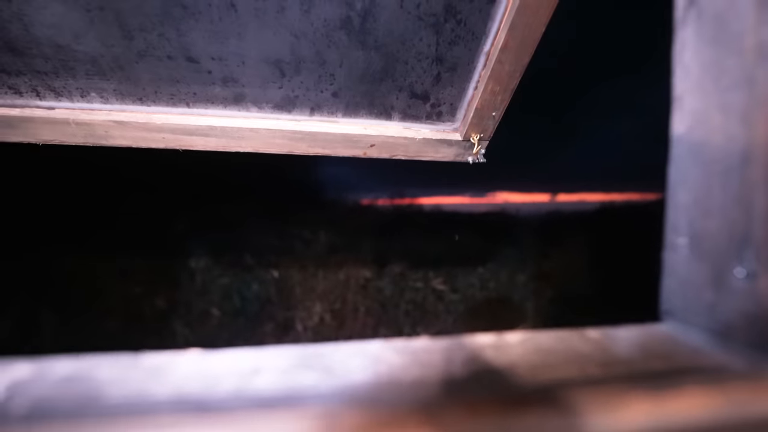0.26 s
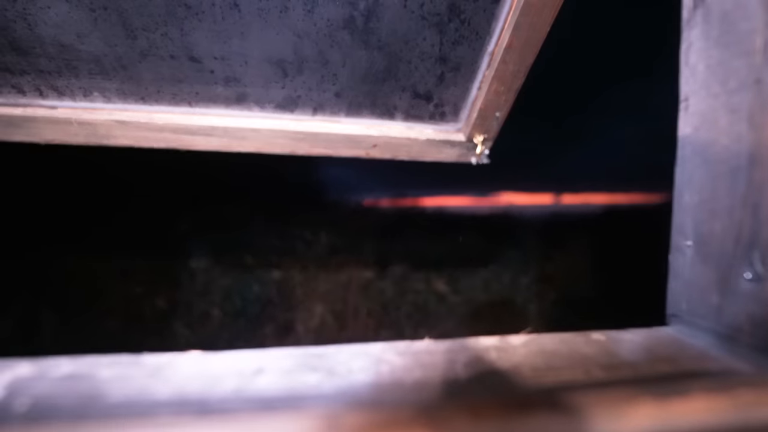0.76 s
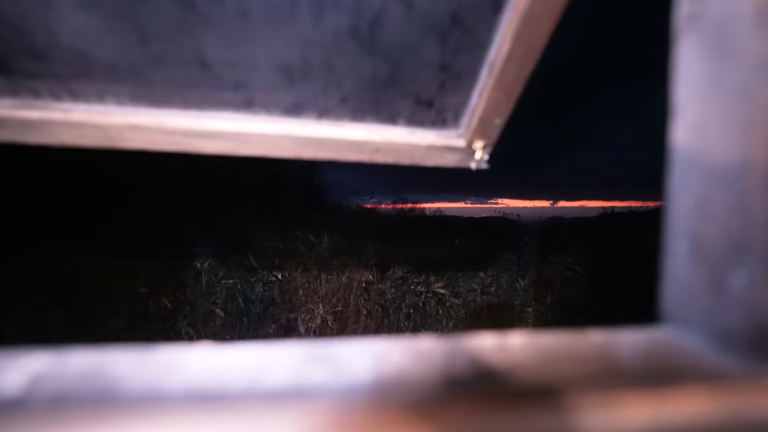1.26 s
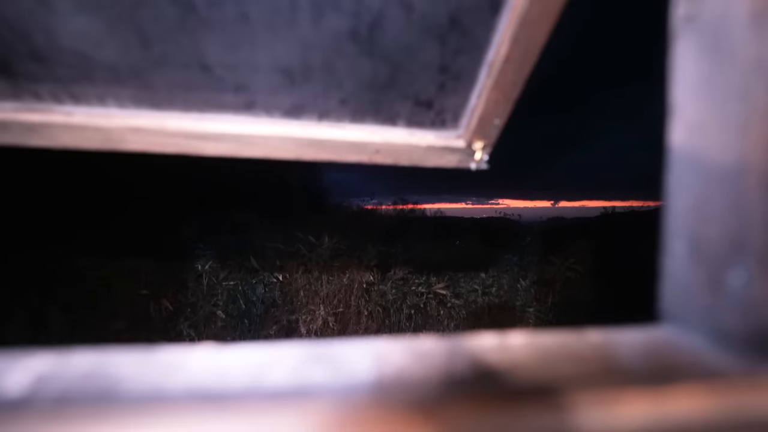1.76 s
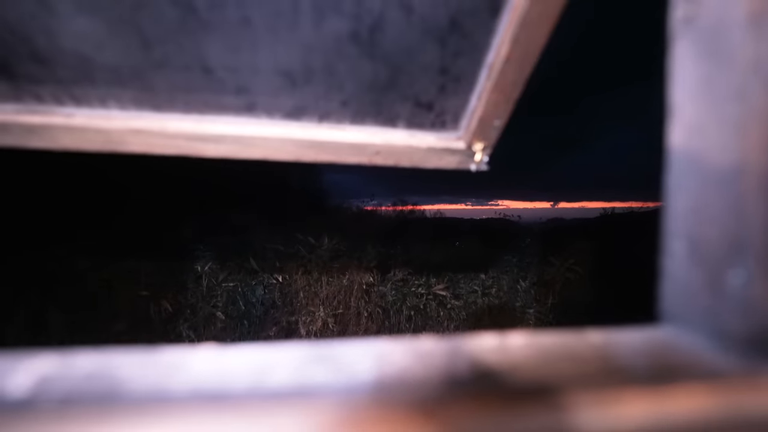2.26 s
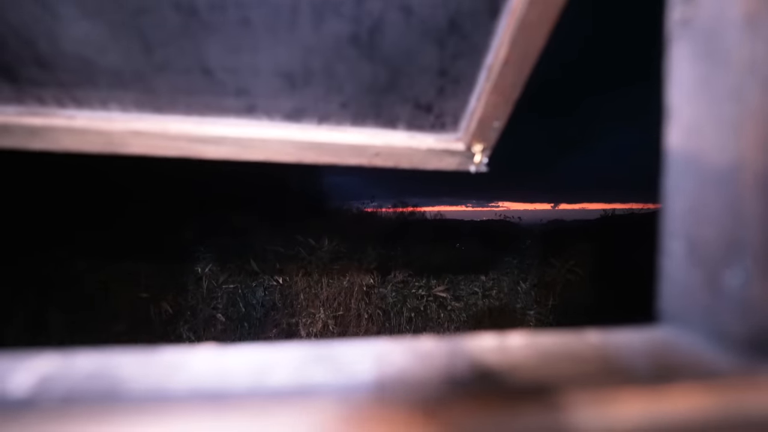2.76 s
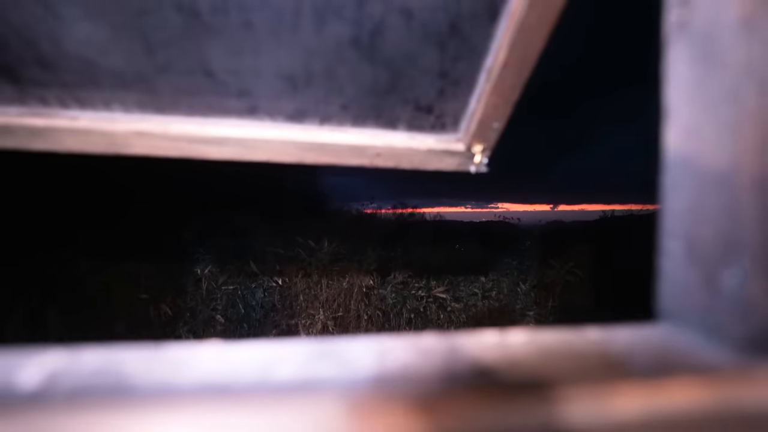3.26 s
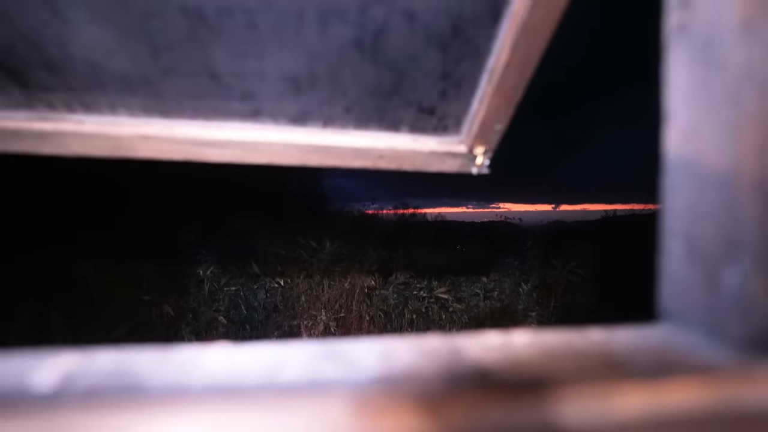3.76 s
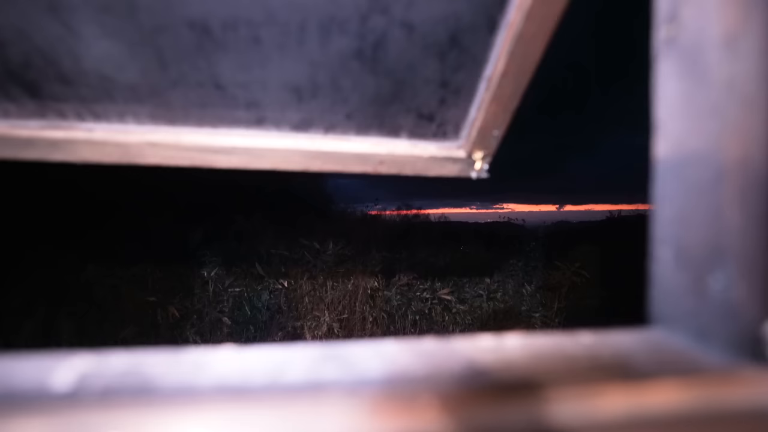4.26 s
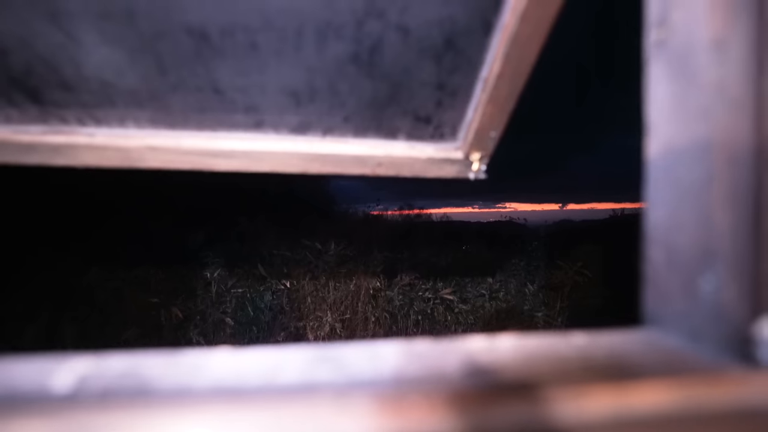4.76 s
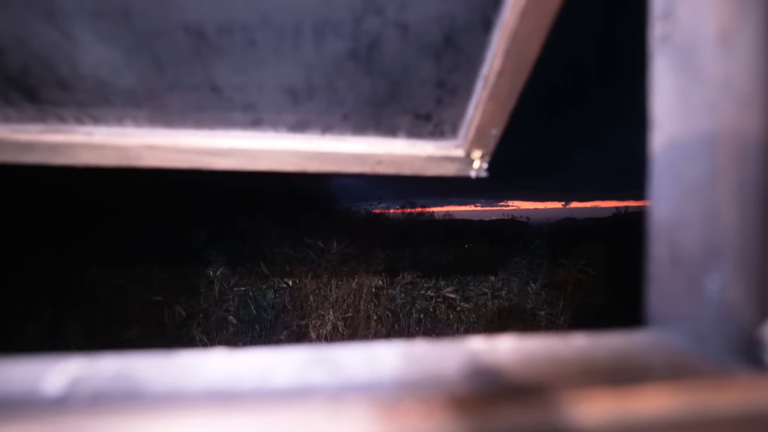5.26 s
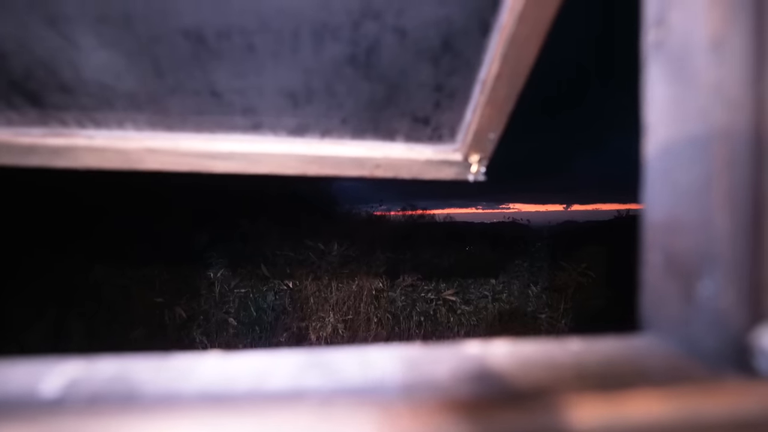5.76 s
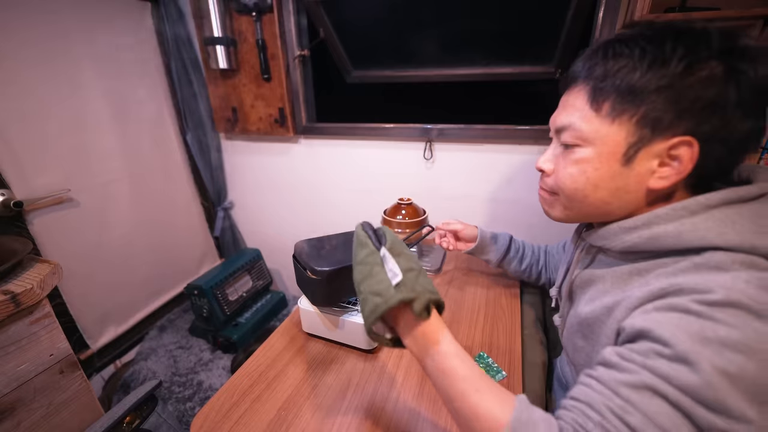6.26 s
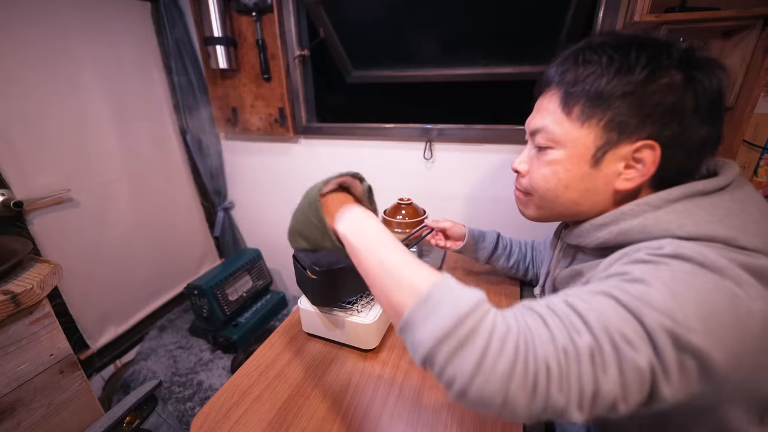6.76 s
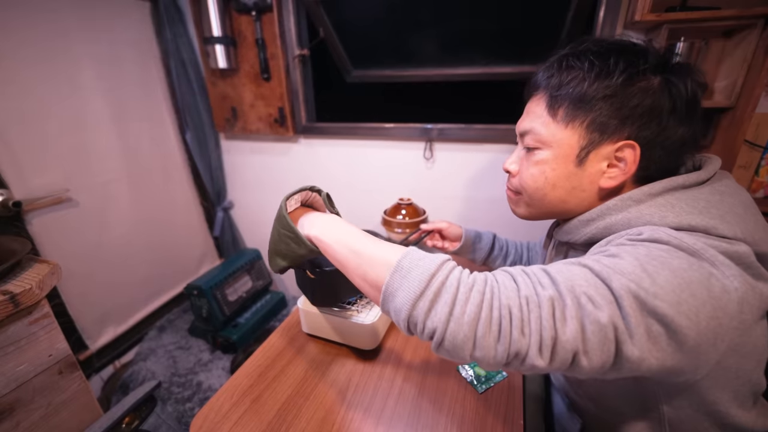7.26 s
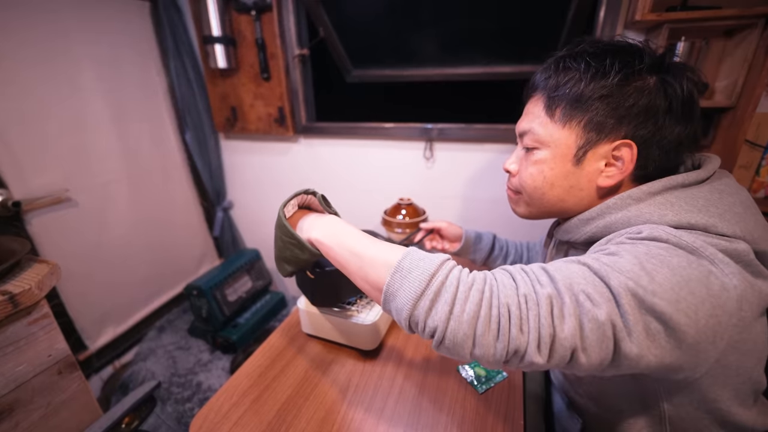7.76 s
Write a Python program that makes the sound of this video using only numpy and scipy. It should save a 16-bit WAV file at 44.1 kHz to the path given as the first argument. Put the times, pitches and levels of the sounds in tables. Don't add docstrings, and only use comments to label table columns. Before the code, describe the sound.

In a small wooden cabin, food simmers under a lid, round bubbles popping irregularly over a faint gas hiss and a steady thin electrical buzz. Wind makes panels hum low and the floor thuds dully, heaviest as a double knock. After about six seconds the microphone is suddenly close: the boil sounds open, with thick low plops and brighter burner hiss, and a metal lid ticks three times on the rim.

```python
import sys
import numpy as np
from scipy import signal
from scipy.fft import rfft, irfft, next_fast_len
from scipy.io import wavfile
from scipy.ndimage import uniform_filter1d

SR = 44100
rng = np.random.default_rng(int(sys.argv[2]) if len(sys.argv) > 2 else 0)


def bounce(signal):
    frames = np.transpose(np.atleast_2d(signal))
    limited = np.clip(frames, -1, 1)
    pcm = np.round(limited * 32767).astype(np.int16)
    wavfile.write(sys.argv[1], SR, pcm)


def volts(x):
    e = np.asarray(x, float) / 20
    return 10 ** e


N = 353682
MOVE_START_S, MOVE_END_S = 6.21, 6.27
SIMMER_DB = -49.5

# freq_hz, density_db
SHUT = [(120, -26), (200, 1), (323, 3), (420, -1.5), (567, 3.5), (832, -15), (915, -13.5), (1040, -10),
        (1160, 0), (1430, -13), (1590, -6), (2090, -16.5), (2270, -13), (2820, -24), (3500, -23),
        (4550, -54), (7700, -120)]
# freq_hz, width_hz, level_db
PAN_SHUT = [(321, 60, 0), (581, 146, -1.5), (924, 59, -4), (1184, 75, 0.5), (1380, 87, -7.5),
            (1620, 90, -7.5), (2225, 92, -18.5)]


def simmer_shut():
    boil = seethe(SHUT, -1.1, low_db=1.7, high_db=1.58)
    return volts(SIMMER_DB) * (boil + froth(PAN_SHUT, 0, 6.3, -4.5, 4.7, decay_s=0.0029, count=1500))


# freq_hz, density_db
OPEN = [(120, -45), (160, -36), (200, -2), (254, -14), (290, -2), (460, -7), (630, -5.5), (760, -16),
        (1100, -19), (1460, -11), (1850, -19.5), (2080, -31.5), (2400, -52), (2900, -30.5), (4500, -77)]
# freq_hz, width_hz, level_db
PAN_OPEN = [(296, 120, -8.5), (470, 31, 1.5), (620, 18, -4), (1107, 27, -3.5), (1460, 68, -9),
            (1853, 65, -12.5), (2415, 270, -12.5)]


def simmer_open():
    boil = seethe(OPEN, 4.1, low_db=1.2, high_db=1.8)
    return volts(SIMMER_DB) * (boil + froth(PAN_OPEN, 5.5, 9.6, -1.0, 1.3, decay_s=0.004, count=2000))


def seethe(shape, db, low_db, high_db):
    x = coloured(shape)
    low = signal.sosfiltfilt(signal.butter(6, 800, fs=SR, output="sos"), x)
    low_swell = volts(low_db * walk(12))
    high_swell = volts(high_db * walk(18))
    return volts(db) * (low_swell * low + high_swell * (x - low))


def froth(pan, start_s, end_s, db, scatter_db, decay_s, count):
    when, chance = rng.random((count, 2)).T
    size = volts(scatter_db * np.minimum(-np.log(chance), 3))
    pops = place(start_s + when * (end_s - start_s), size[:, None] * puffs(decay_s, count, size=600))
    ring = resound(pops, pan)
    return volts(db) * ring / np.std(ring[int(start_s * SR):int(end_s * SR)])


# start_s, peak_db, pan_ring_hz, low_ring_db
BUBBLES = [(0.0638, -33, 1190, -6), (0.172, -36.5, 1140, 3), (0.3253, -33.5, 1190, 2.5),
           (0.4249, -32.5, 1140, 0), (0.7126, -29.5, 1200, -7), (1.0316, -33.5, 1180, -2),
           (1.3309, -29.5, 1220, 1.5), (1.3836, -32, 1140, -11), (1.4319, -27, 1130, -25),
           (1.502, -34, 1180, -11), (1.728, -28, 1157, -10), (1.8176, -30, 1190, -18),
           (1.8696, -30.5, 1190, -5), (1.9111, -33, 1220, -5.5), (2.5183, -27.5, 1230, -7),
           (2.594, -28, 1144, -1), (3.0958, -27, 1240, -9), (3.265, -29.5, 1200, -5),
           (3.5857, -30.5, 1230, 0.5), (3.6936, -35, 1100, -1), (3.7853, -32, 1160, -18),
           (4.0049, -34, 1140, -24), (4.4235, -32.5, 1210, -18), (4.7496, -26, 1126, -5),
           (5.015, -26, 1202, -10), (5.2057, -29, 1180, -2), (5.7493, -34, 1110, 8),
           (5.9144, -30, 1170, -8), (6.0659, -28.5, 1180, 0), (6.1933, -29.5, 1074, -5)]


def bubbles_shut():
    medium = middling(np.array(BUBBLES)[:, 0], 0, MOVE_START_S, 1170, -5, count=84)
    rows = np.r_[trailed(BUBBLES), medium]
    return bursts(rows, PAN_SHUT, low_hz=579, decay_s=0.0027, tone_db=-3.5)


# start_s, peak_db, pan_ring_hz, low_ring_db
OPEN_BUBBLES = [(6.3158, -40, 1390, -7), (6.432, -30.5, 1170, -5), (6.5869, -36, 1460, 4),
                (6.6984, -31, 1380, 9), (6.8984, -31, 1460, 10), (7.0074, -39, 1260, 14),
                (7.1154, -35, 1440, 3), (7.1474, -34, 1400, 15), (7.1954, -30.5, 1550, 12),
                (7.3906, -28.5, 1510, 6), (7.8387, -35, 1100, 11), (7.872, -40, 1510, 7)]


def bubbles_open():
    large_s = np.r_[np.array(OPEN_BUBBLES)[:, 0], TICKS[0][0]]
    medium = middling(large_s, MOVE_END_S, N / SR, 1400, 0, count=24)
    rows = np.r_[OPEN_BUBBLES, medium] - [0, 3.5, -2, 5.5]
    return bursts(rows, PAN_OPEN, low_hz=460, decay_s=0.0026, tone_db=-5.0)


def trailed(table):
    u = rng.random((len(table), 2)).T
    lag_s, change_db = 0.01 + 0.011 * u[0], -7.5 - 4.0 * u[1]
    return np.r_[table, table + np.c_[lag_s, change_db, 0 * u.T]]


def middling(large_s, start_s, end_s, hz, low_db, count):
    loudest_db, span_db, pitch_spread, lull_s = -37, 7, 0.05, 0.035
    u, g = rng.random((count, 2)).T, rng.standard_normal((count, 2)).T
    s = start_s + (np.arange(count) + u[0]) * (end_s - start_s) / count
    wait = large_s - s[:, None]
    rows = np.c_[s, loudest_db - span_db * u[1], hz * (1 + pitch_spread * g[0]), low_db + 5.0 * g[1]]
    return rows[~((wait > -lull_s / 4) & (wait < lull_s)).any(axis=1)]


def bursts(table, pan, low_hz, decay_s, tone_db):
    s, db, hz, low_db = np.transpose(table)
    burst = puffs(decay_s, len(s), size=1600)
    g = rng.standard_normal((len(s), 2)).T
    out = rings(s, hz, db + tone_db, 0.028, 0.0013, glide=0.0072 * g[0], size=1600)
    low_note_hz = low_hz * (1 + 0.11 * g[1])
    out += rings(s, low_note_hz, db + low_db + tone_db + 0.5, 0.021, 0.0012, glide=0.02, size=1600)
    upper = [mode for mode in pan if mode[0] > 1000]
    lower = [mode for mode in pan if mode[0] < 800]
    for part, part_db in ((upper, db - 8.5), (lower, db + low_db - 8.5)):
        ring = resound(burst, part, tilt_db=2.0)
        out += place(s, ring * (volts(part_db) / abs(ring).max(axis=1))[:, None])
    return out


def puffs(decay_s, count, size):
    t = np.arange(size) / SR
    tear = rng.standard_normal((count, size)) * np.exp(-t / decay_s) * np.minimum(t / 0.001, 1)
    return signal.sosfilt(signal.butter(3, 2600, fs=SR, output="sos"), tear)


def resound(x, pan, tilt_db=0):
    uneven = np.ones(len(pan))
    if tilt_db:
        uneven = volts(tilt_db * rng.standard_normal((len(pan), len(x), 1)))
    return sum((-1) ** k * uneven[k] * volts(db) * band(x, hz, 1.47 * width)
               for k, (hz, width, db) in enumerate(pan))


# start_s, peak_db, pitch_hz
PLOPS = [(6.314, -39, 616), (6.354, -41, 463), (6.433, -41, 468), (6.532, -42, 452), (6.607, -30.5, 460),
         (6.698, -34, 455), (6.779, -32, 342), (6.841, -33, 484), (6.898, -28.5, 385), (7.008, -34, 471),
         (7.114, -32, 655), (7.148, -33, 458), (7.196, -38, 301), (7.263, -40, 482), (7.322, -39, 468),
         (7.368, -35, 463), (7.452, -31, 348), (7.488, -33, 385), (7.515, -44, 466), (7.6, -39, 396),
         (7.807, -39, 455), (7.839, -34, 600), (7.871, -26.5, 463), (7.922, -33, 385), (7.943, -31, 460)]


def plops():
    s, db, hz = np.transpose(PLOPS)
    return rings(s, hz, db + 3, t60_s=0.017, rise_s=0.00037, glide=0.05, size=900)


# start_s, level_db, pitch_hz
SPITS = [(0.295, -62, 6500), (0.531, -57, 5800), (0.931, -55.5, 3600), (1.132, -56, 3700),
         (1.164, -56, 5700), (1.59, -58, 5400), (1.78, -57, 4800), (2.053, -57, 6070), (2.337, -56, 7200),
         (2.361, -59, 5500), (2.604, -57, 4900), (2.702, -57, 5900), (3.034, -52, 7000), (3.283, -60, 7200),
         (3.42, -56, 5900), (3.463, -55.5, 5800), (3.693, -60, 5800), (3.879, -56, 5900),
         (4.057, -57, 6800), (4.339, -60, 6600), (4.458, -62, 5300), (5.215, -59, 5500), (5.357, -61, 4200),
         (6.131, -56, 6000), (6.38, -58, 3700), (6.76, -57, 4100), (7.11, -56, 5500), (7.542, -57, 7460),
         (7.891, -59, 8600), (7.935, -58, 7000)]


def spits():
    t = np.arange(1500) / SR
    u, v = rng.random((220, 3)), rng.random((32, 3))
    faint = np.c_[u[:, 0] * N / SR, -66 + 5 * u[:, 1], 4000 * 3.2 ** u[:, 2]]
    weak = np.c_[v[:, 0] * N / SR, -62.5 + 4 * v[:, 1], 3700 * 2.2 ** v[:, 2]]
    rows = np.r_[SPITS, weak, faint]
    puff = t / 0.003 * np.exp(1 - t / 0.0043)
    shapes = [volts(db - 2.5) * puff * unit(band(rng.standard_normal(len(t)), hz, 0.38 * hz))
              for _, db, hz in rows]
    return place(np.maximum(rows[:, 0] - 0.002, 0), np.array(shapes))


# start_s, peak_db, treble_db (per octave)
TICKS = [
    (7.454, -28.5, 3),
    (7.5956, -33, 2),
    (7.727, -25.5, 1.5),
]
# freq_hz, level_db, t60_s
LID = [(613, -0.5, .06), (1100, -9, 0.024), (1340, 0, 0.025), (1810, -3, 0.02), (2480, -10.5, 0.053),
       (3160, -14, 0.02), (3700, -21, .02)]


def lid():
    s, db, treble_db = np.transpose(TICKS)
    touch = 0
    for hz, mode_db, t60_s in LID:
        level_db = db + mode_db - 5.5 + treble_db * np.log2(hz / 1500)
        touch = touch + rings(s, hz, level_db, t60_s * 0.9, rise_s=0.00018, glide=0, size=2500)
    return touch + volts(-12) * np.roll(touch, int(0.0027 * SR))


def cabin(x):
    t = np.arange(int(0.25 * SR)) / SR
    tail = rng.standard_normal(len(t)) * volts(-60 * t / 0.09) * (t > 0.003)
    return x + volts(-11) * signal.fftconvolve(x, tail / np.linalg.norm(tail))[:N]


# freq_hz, density_db
HISS_FAR = [(1500, -28), (2500, 0.5), (4000, 1), (7000, -2), (9000, -7), (12000, -10.5), (16000, -31)]


def burner_far():
    return hiss(HISS_FAR, -63.5, flicker_db=1.4)


# freq_hz, density_db
HISS_NEAR = [(1500, -0.5), (3000, -3), (4200, -3.5), (4360, 0), (4550, -4.5), (4950, -3.5), (5110, 2),
             (5270, -6), (7000, -7.5), (7250, -5.5), (7500, -7), (10000, -12.5), (16000, -16)]


def burner_near(since_s):
    return hiss(HISS_NEAR, -53 - 0.9 * since_s, flicker_db=0.44)


def hiss(shape, db, flicker_db):
    return volts(db + flicker_db * walk(25) + 0.24 * walk(2.8)) * coloured(shape)


# time_s, lag_ms
WANDER = [
    (0, .033),
    (.7, .018),
    (1.3, .064),
    (2.2, -.003),
    (3.7, .098),
    (4.52, .005),
    (5.1, -.085),
    (5.2, -.062),
    (6.3, -.21),
]


def inverters_far():
    t = np.arange(N) / SR
    main = main_inverter(curve(WANDER, 1), -31 + 3.6 * (t > 4.53))
    return main + second_inverter(lag_ms=-3.366, first_slip_s=1.175, db=-37.5)


def inverters_near(since_s):
    main = main_inverter(3.22 - 0.1 * since_s, -37 - 1.6 * since_s)
    return main + second_inverter(lag_ms=-1.12, first_slip_s=7.75, db=-39)


def main_inverter(lag_ms, db):
    return spikes(120.156, lag_ms, db)


def second_inverter(lag_ms, first_slip_s, db):
    creep_ms_per_s, slip_ms, slip_every_s = 0.006, 0.06, 2.1
    t = np.arange(N) / SR
    slips = np.maximum(np.ceil((t - first_slip_s) / slip_every_s), 0)
    lag = lag_ms + creep_ms_per_s * t + slip_ms * slips
    return signal.lfilter([1, -0.3], 1, spikes(120.84, lag, db + 0 * t))


def spikes(rate_hz, lag_ms, db):
    k = np.arange(1, int(N / SR * rate_hz))
    beat = (k / rate_hz * SR).astype(int)
    at = (k / rate_hz + lag_ms[beat] / 1000) * SR
    gap = np.arange(-16, 17) - (at % 1)[:, None]
    shapes = np.sinc(gap) * np.cos(np.pi * gap / 34) ** 2
    size = (-1.0) ** k * volts(db[beat] + 0.64 * rng.standard_normal(len(k)))
    return place((np.floor(at) - 15.5) / SR, size[:, None] * shapes)


# start_s, peak_db, pitch_hz, t60_s, low_octave_db
THUDS = [
    (1.173, -25.5, 89.5, 0.08, 11.5),
    (2.532, -15, 87.8, 0.17, -1),
    (2.604, -14, 88, 0.12, 3),
    (3.884, -22.5, 82.5, 0.066, -16),
]


def thuds():
    s, db, hz, t60_s, low_db = np.transpose(THUDS)
    note = -rings(s - 0.003, hz, db + 5.5, t60_s, rise_s=0.012, glide=0, size=16000)
    low = rings(s, hz * 0.465, db + low_db, t60_s * 1.2, rise_s=0.015, glide=0, size=16000)
    return signal.sosfilt(signal.butter(4, 150, fs=SR, output="sos"), note + low)


# centre_s, change_db, length_s
FLARES = [(.3, 3, 0.24), (.85, 6, 0.28), (1.388, 15, 0.084), (1.554, 3, 0.09), (1.933, 11, 0.14),
          (3.18, 8, 0.084), (3.567, 3.5, 0.23), (4.387, 5, 0.17), (5.0, 2, .15), (5.344, 3.5, 0.15),
          (6.7, 4.5, 0.26), (7.503, -11, 0.22)]


def flutter_db(near, gusty_db):
    t = np.arange(N) / SR
    far_db = -41.5 + 2 * walk(8)
    db = (1 - near) * far_db + near * -40
    db += 0.1 * (gusty_db - uniform_filter1d(gusty_db, 2 * SR))
    return db + sum(change * np.clip(1 - abs(t - s) / length, 0, 1) for s, change, length in FLARES)


# time_s, strength_db
WIND = [(0.0, -22), (0.29, -29.5), (0.36, -37), (0.58, -24.5), (1.07, -35.5), (1.54, -31.5), (1.65, -39.5),
        (1.92, -21), (2.17, -41.5), (2.21, -28.5), (2.99, -27.5), (3.06, -33), (5.11, -33), (5.23, -25.5),
        (5.38, -49), (5.41, -34), (8.0, -40), (8.02, -46)]
# freq_hz, width_hz
BODY_BANDS = [
    (14, 11),
    (36, 15.9),
]


def body(near):
    wind_db = curve(WIND, 1)
    gusty_db = wind_db - wind_db.mean()
    sway_db = wind_db + 1.5 - 16.5 * near
    out = volts(-51.5 + 0.034 * gusty_db) * unit(band(rng.standard_normal(N), 120.6, 125))
    for db, (hz, width) in zip((sway_db, flutter_db(near, gusty_db)), BODY_BANDS):
        x = band(rng.standard_normal(N), hz, width, order=3)
        swell = uniform_filter1d(abs(signal.hilbert(x, next_fast_len(N))[:N]), int(SR / hz))
        out += volts(db) * unit(x / (swell + 0.62 * swell.mean()) ** 0.31)
    return out


# centre_s, length_s, freq_hz, width_hz, level_db
GUSTS = [
    (0.77, 0.84, 318, 82, -50),
    (0.09, .5, 164, 42, -47.5),
    (0.092, 0.5, 125, 48, -46.5),
    (0.99, 1.6, 85, 19, -47),
    (1.18, 0.09, 165, 50, -44),
    (0.44, 0.14, 163, 33, -51),
    (.62, 0.44, 478, 70, -55),
]


def gusts():
    t = np.arange(2 * SR) / SR
    out = np.zeros(N)
    for s, length, hz, width, db in GUSTS:
        gust = np.exp(-(2 * (t - s) / length) ** 2)
        out[:2 * SR] += volts(db) * gust * unit(band(rng.standard_normal(2 * SR), hz, width))
    return out


def curve(table, column):
    rows = np.array(table)
    return np.interp(np.arange(N) / SR, rows[:, 0], rows[:, column])


def unit(x):
    return x / np.sqrt(np.mean(x ** 2))


def coloured(shape):
    hz, db = np.transpose(shape)
    size = next_fast_len(N, real=True)
    log_hz = np.log(np.arange(1, size // 2 + 2) * SR / size)
    gain = volts(np.interp(log_hz, np.log(hz), db))
    return unit(irfft(rfft(rng.standard_normal(size)) * gain, size)[:N])


def band(x, hz, width, order=2):
    edges = np.clip([hz - width / 2, hz + width / 2], 2, SR / 2.2)
    return signal.sosfilt(signal.butter(order, edges, "band", fs=SR, output="sos"), x)


def walk(rate_hz):
    k = int(SR / rate_hz)
    return unit(uniform_filter1d(np.repeat(rng.standard_normal(N // k + 1), k), k)[:N])


def place(s, shapes):
    at = (np.asarray(s) * SR).astype(int)[:, None] + np.arange(shapes.shape[1])
    return np.bincount(at.ravel(), shapes.ravel(), N + shapes.shape[1])[:N]


def rings(s, hz, db, t60_s, rise_s, glide, size):
    t = np.arange(size) / SR
    hz, db, t60_s = (np.broadcast_to(v, np.shape(s))[:, None] for v in (hz, db, t60_s))
    phase = 2 * np.pi * hz * t * (1 + np.reshape(glide, (-1, 1)) * t * 50)
    fade = np.clip((size - np.arange(size)) / (size / 4), 0, 1)
    envelope = volts(db - 60 * t / t60_s) * (1 - np.exp(-t / rise_s)) * fade
    return place(s, envelope * np.sin(phase))


def scene():
    t = np.arange(N) / SR
    near = np.interp(t, (MOVE_START_S, MOVE_END_S), (0, 1))
    since_s = t - MOVE_START_S
    far = simmer_shut() + burner_far() + inverters_far()
    close = simmer_open() + burner_near(since_s) + inverters_near(since_s)
    events = cabin(bubbles_shut() + bubbles_open() + plops() + spits() + lid())
    mix = (1 - near) * far + near * close + events + thuds() + body(near) + gusts()
    return mix[None]


def top_cut(x):
    return signal.sosfilt(signal.butter(12, 16490, fs=SR, output="sos"), x)


def record(dry):
    cut = signal.fftconvolve(dry, signal.firwin(401, 15800, fs=SR)[None], "same")
    return top_cut(cut)


dry = scene()
out = record(dry)
bounce(out)
```